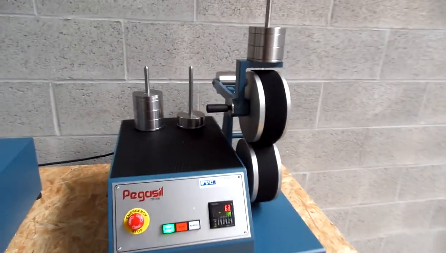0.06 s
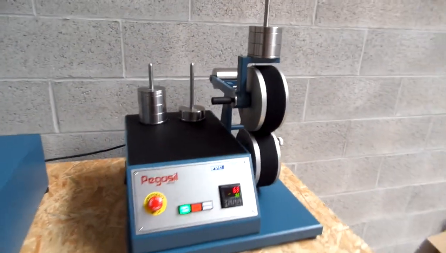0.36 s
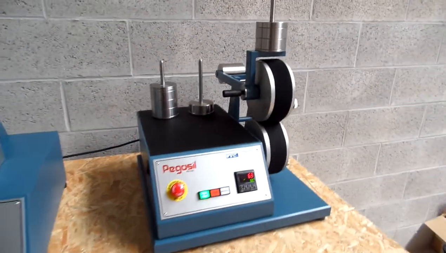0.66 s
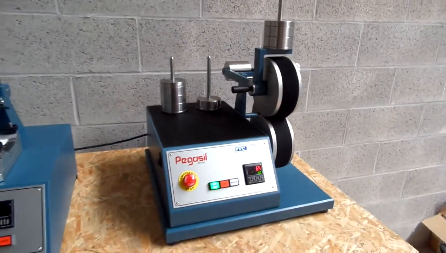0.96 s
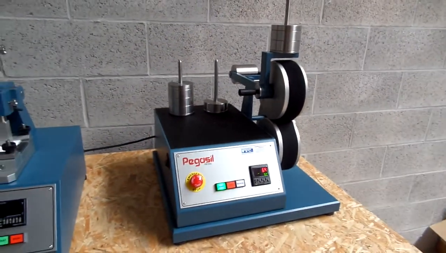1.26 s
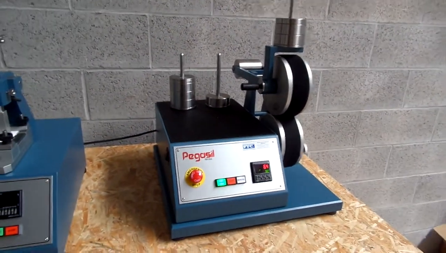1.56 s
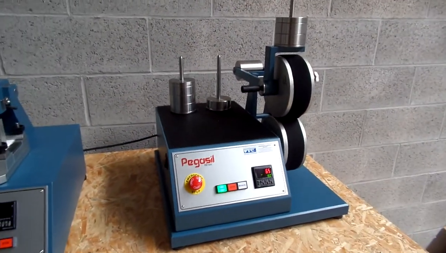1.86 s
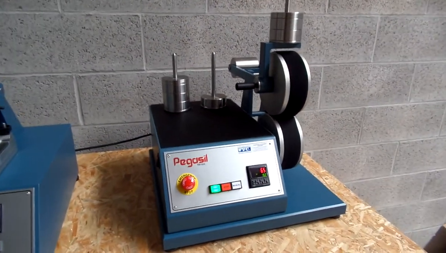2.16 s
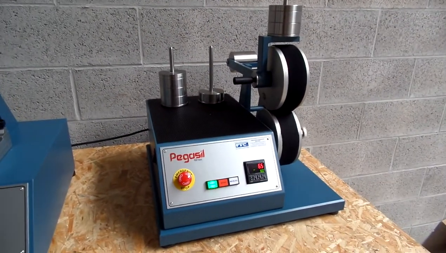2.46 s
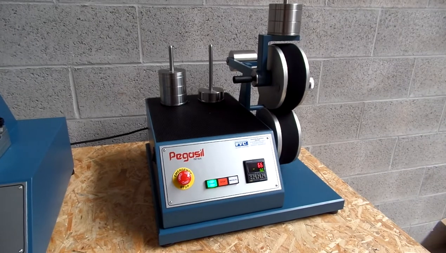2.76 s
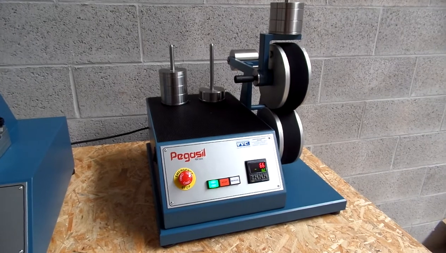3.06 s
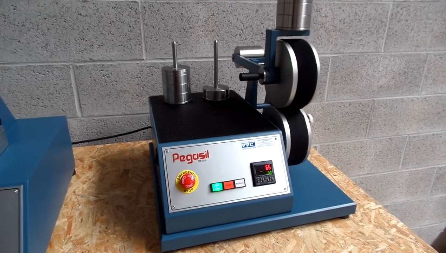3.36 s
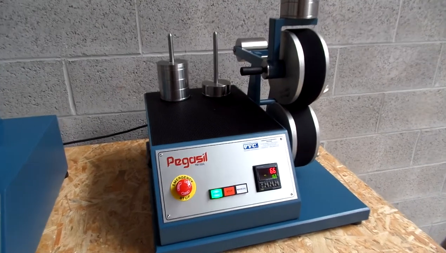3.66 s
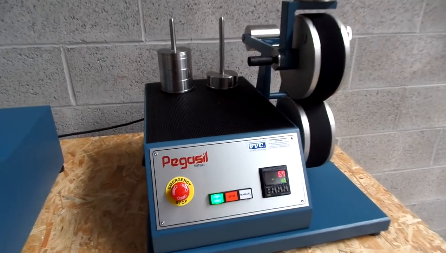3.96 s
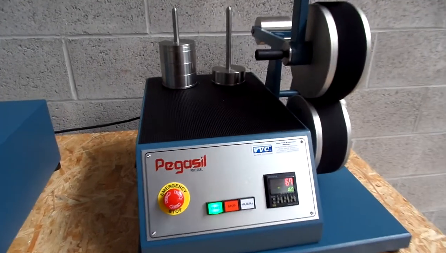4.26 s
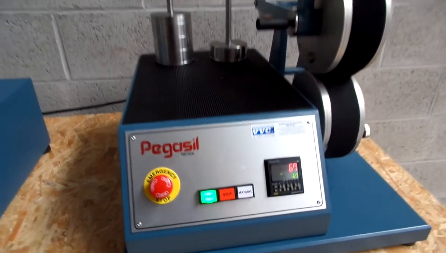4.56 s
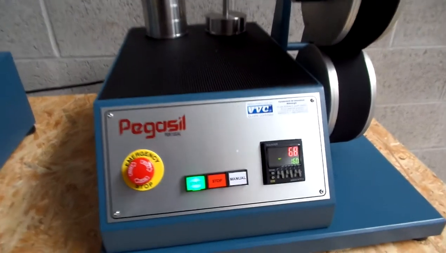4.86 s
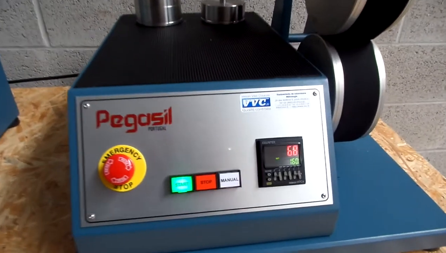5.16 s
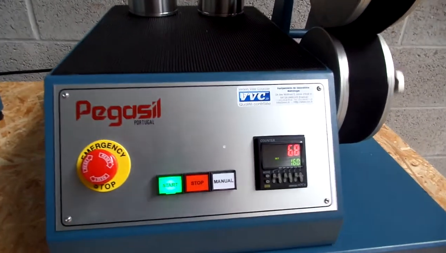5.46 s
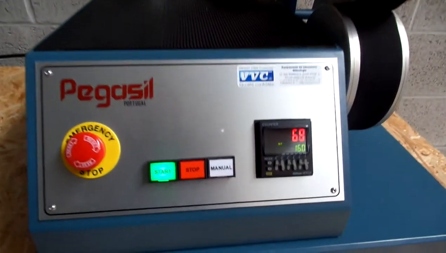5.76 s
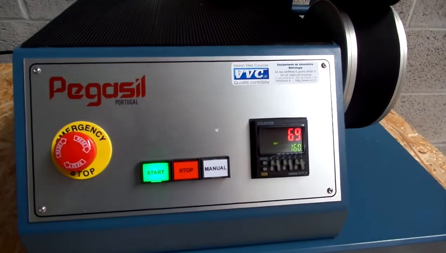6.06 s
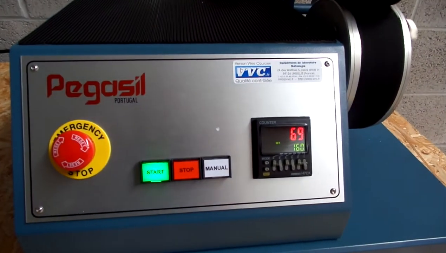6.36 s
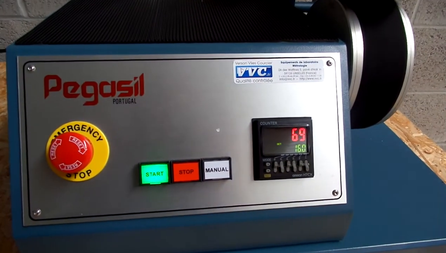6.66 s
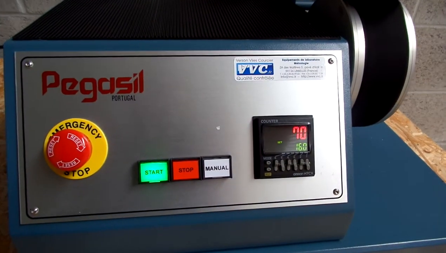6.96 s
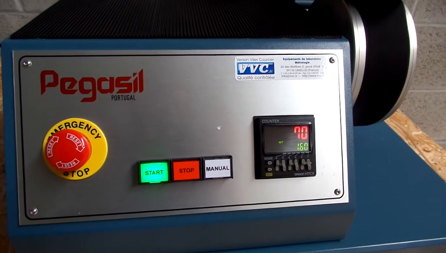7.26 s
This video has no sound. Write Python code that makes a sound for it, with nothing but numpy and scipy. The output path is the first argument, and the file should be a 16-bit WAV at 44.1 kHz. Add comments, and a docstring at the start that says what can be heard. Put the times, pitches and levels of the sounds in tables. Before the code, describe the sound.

A machine rolls two drums of hook-and-loop tape together, making a steady buzzing rasp over a low hum and soft regular bumps.

```python
"""A buzzing rasp comes first: rows of tiny hooks tearing out of their loops, with a fizz of fine fibres.
A bench-top tester rolls two drums covered in hook-and-loop tape together, about one turn a second.
Its frame hums and rumbles. As each drum's tape joint passes, the rasp dips and the frame bumps.
Now and then a stubborn hook lets go with a tick. The microphone drifts back and then closes in,
so echoes from nearby surfaces sweep through the rasp."""
import sys
import numpy as np
from scipy import signal
from scipy.fft import rfft, irfft, next_fast_len
from scipy.io import wavfile
from scipy.ndimage import uniform_filter1d, map_coordinates

SR = 44100
rng = np.random.default_rng(int(sys.argv[2]) if len(sys.argv) > 2 else 0)


def master_out(mix):
    """Clip the mix to full scale and print it as 16-bit PCM to the path in sys.argv[1]."""
    frames = np.transpose(np.atleast_2d(mix))
    ceiling = np.clip(frames, -1, 1)
    pcm = np.round(ceiling * 32767).astype(np.int16)
    wavfile.write(sys.argv[1], SR, pcm)


N = 321930
TIME_S = np.arange(N) / SR
ROW_HZ, GEAR_HZ = 161.0, 41.8
# Each drum's tape joint: first_pass_s, turn_s. The idler drum is slightly larger, so it falls behind.
DRIVEN, IDLER = (.397, .9995), (.605, 1.0178)

def amp(db):
    """Turn decibels into gain."""
    return 10 ** (np.asarray(db) / 20)

def unit(x):
    """Scale to an average (rms) level of 1."""
    return x / np.sqrt(np.mean(x ** 2) + 1e-20)

def noise():
    """Plain white hiss."""
    return rng.standard_normal(N)

def along(points, hz):
    """Read between (pitch_hz, value) points on a log pitch scale."""
    pitches, values = np.transpose(points)
    return np.interp(np.log(hz + 1), np.log(pitches + 1), values)

def curves(table):
    """Turn each column after time_s into one value per sample."""
    times, *columns = np.transpose(table)
    return [np.interp(TIME_S, times, column) for column in columns]

def wobble(rate):
    """A smooth curve through `rate` random points a second."""
    coarse_s = TIME_S[::32]
    points = rng.standard_normal(int(N * rate / SR) + 4)
    return np.interp(TIME_S, coarse_s, map_coordinates(points, [coarse_s * rate], mode="nearest"))

def bell(centre_s, half_s):
    """A smooth hump of height 1."""
    return np.exp(-np.minimum(((TIME_S - centre_s) / half_s) ** 2, 20))

def filtered(x, response):
    """Weight each frequency in x by response(hz)."""
    size = 2 * next_fast_len(N // 2 + SR // 4)
    return irfft(rfft(x, size) * response(np.fft.rfftfreq(size, 1 / SR)), size)[:N]

def coloured(x, spectrum):
    """Give x a tone colour, with no ringing ahead of a click."""
    def response(hz):
        cepstrum = irfft(np.log(amp(along(spectrum, hz))))
        return np.exp(rfft(2 * cepstrum[:len(hz) - 1], len(cepstrum)))
    return unit(filtered(x, response))

def ringing(x, modes):
    """Let x ring at each (pitch_hz, width_hz, level_db)."""
    def response(hz):
        return sum(amp(db) * 1j * hz * width / (pitch ** 2 - hz ** 2 + 1j * hz * width)
                   for pitch, width, db in modes)
    return unit(filtered(x, response))

def crackle(per_second, spread_db, life_s):
    """Tiny bursts of hiss at random moments."""
    sizes = amp(spread_db * np.clip(noise(), -3, 2.6))
    energy = (rng.random(N) < per_second / SR) * sizes ** 2
    fading = signal.lfilter([1], [1, -np.exp(-2 / (life_s * SR))], energy)
    return unit(np.sqrt(fading) * noise())

def passes(drum):
    """The times when a drum's joint meets the other drum."""
    first_s, turn_s = drum
    return np.arange(first_s, N / SR, turn_s)

def row_blur():
    """Rows blur together (1) from each driven joint until just after the idler's; otherwise 0."""
    between = sum((TIME_S > start) & (TIME_S < end + .05)
                  for start, end in zip(passes(DRIVEN), passes(IDLER)))
    return uniform_filter1d(between * 1.0, size=2000)

def release(rows, aligned):
    """Hooks let go in one burst a row, every second one stronger; gear teeth shake the timing."""
    flutter = .085 * np.sin(2 * np.pi * GEAR_HZ * TIME_S + .8 * wobble(5))
    phase = 2 * np.pi * (rows + flutter + .05 * wobble(70))
    burst = np.tanh(2.3 * (np.sin(phase) + .25 * np.cos(2 * phase) + .1))
    return (1 + aligned * burst) * amp(0.69 * np.sin(phase / 2))

# Tone colour of tearing hooks: pitch_hz, relative_db
HOOK_COLOUR = [(300, -26.5), (1700, -25), (2120, -17.5), (2300, -8), (2850, 0), (3350, 1), (3900, -3.5),
               (4500, -1), (5300, -1.5), (6200, 0), (6750, 1.5), (8100, 1.5), (9200, -11), (16000, -20)]
def hook_rasp(rate, level_db, close):
    """Hooks snap out of their loops; the slightly uneven drums press hardest once a turn."""
    turns = (TIME_S - DRIVEN[0]) / DRIVEN[1]
    press_db = 0.8 * np.cos(2 * np.pi * (turns - 0.57))
    hooks = coloured(crackle(3000 * rate, spread_db=3.5, life_s=0.00024), HOOK_COLOUR)
    return amp(level_db - 0.37 + press_db + 0.25 * wobble(18)) * hollow_tone(hooks, close)

def hollow_tone(x, close, far_hz=4100, near_hz=3060, width_hz=240):
    """A hollow ring in the rasp slides down and grows as the microphone closes in."""
    carrier = np.exp(2j * np.pi * np.cumsum(far_hz + (near_hz - far_hz) * close) / SR)
    decay = np.exp(-np.pi * width_hz / SR)
    ring = 2 * np.real(carrier * signal.lfilter([1 - decay], [1, -decay], x / carrier))
    return x + 0.28 * close * ring

# Tone colour of the fine fibres: pitch_hz, relative_db
FIBRE_COLOUR = [(3000, -30), (8000, -13.5), (9500, -8.5), (12500, -4.5), (14500, -1.5), (16000, -1)]
def fibre_fizz(rate, level_db, boost_db, grip, usual_db=-23):
    """Fine fibres fizz, and flare as the tape end flicks free just before the driven joint."""
    fibres = crackle(4000 * (rate + 0.89), spread_db=4.0, life_s=0.000079)
    fizz_db = -28.3 + 1.15 * (level_db - usual_db) + boost_db  # swings wider than the rasp
    flick = amp(level_db - 3.5) * sum(bell(s - .015, 0.0089) for s in passes(DRIVEN))
    return (amp(fizz_db) * grip ** 0.84 + flick) * coloured(fibres, FIBRE_COLOUR)

# Notes of the drum walls: pitch_hz, width_hz, far_level_db, close_change_db
WALL_NOTES = [(440, 140, 0, -8), (512, 72, 3.5, -8.5), (770, 80, 0, 1.5), (917, 180, 3.5, -12),
              (1281, 60, 3.5, 3), (1498, 34, 5, 3), (1634, 147, 6, -0.5), (1968, 134, 8.5, -2)]
def drum_walls(rate, close):
    """Tugging hooks ring the drum walls; each note swells and fades as the microphone moves."""
    tugs = crackle(3000 * (rate + 0.73), spread_db=0.0, life_s=0.00068)
    tugs = filtered(tugs, lambda hz: hz ** 6 / (hz ** 6 + 340 ** 6))  # small drums give no bass
    walls = np.zeros(N)
    for hz, width_hz, far_db, change_db in WALL_NOTES:
        note = signal.lfilter(*signal.iirpeak(hz, hz / width_hz, SR), tugs)
        walls += amp(far_db + change_db * close + 2.6 * wobble(4)) * note
    return unit(walls)

# Echoes off machine, bench and wall, and what closeness and descent add to each:
# delay_ms, close_ms, descent_ms, gain, close_gain, descent_gain
NEAR_SURFACES = [(0.694, 0.26, 0.0019, .39, -0.21, -0.15), (1.08, 0.0029, 0.313, 0.16, .03, -.17),
                 (1.27, 0.0031, .52, .16, 0.013, .03)]
def near_echoes(x, close, descent, share):
    """Quick echoes shift as the microphone moves; share scales their strength."""
    total, power = x, 1
    for ms, close_ms, descent_ms, gain, close_gain, descent_gain in NEAR_SURFACES:
        delay_ms = ms + close_ms * close + descent_ms * descent
        strength = share * (gain + close_gain * close + descent_gain * descent)
        total = total + strength * map_coordinates(x, [np.arange(N) - delay_ms * SR / 1000])
        power = power + strength ** 2
    return total / np.sqrt(power)

# Base loudness of the tearing tape: time_s, level_db
TAPE_LOUDNESS = [(0, -26.0), (1, -25.0), (2, -23), (3, -22.5), (3.5, -23.5), (3.9, -21), (4.5, -22),
                 (5.2, -22), (6.3, -24.5), (7, -23), (7.3, -23.5)]
# Microphone path: time_s, closeness (0 far, 1 near), descent (0 above the drums, 1 at the front panel)
MICROPHONE_PATH = [(0, .52, 0), (.7, .04, .04), (1.2, 0, .11), (2, .08, .18), (3.3, .14, .21),
                   (3.9, .42, .27), (4.5, .66, .36), (5.2, 1, .64), (5.9, .93, .93), (7.3, .85, 1)]
def tearing_tape(rows, aligned, blur):
    """Rasp, fizz and ringing drum walls all dip as a joint passes."""
    level_db, = curves(TAPE_LOUDNESS)
    close, descent = curves(MICROPHONE_PATH)
    rate = release(rows, aligned)
    driven_dip_db = 6.6 * sum(bell(s, half_s=0.013) for s in passes(DRIVEN))
    idler_dip_db = 5.8 * sum(bell(s, half_s=0.025) for s in passes(IDLER))
    grip = amp(-driven_dip_db - idler_dip_db)
    # Blurred rows rasp louder but tug the walls less.
    blur_db, wall_blur_db = 1.46 * blur, -1.3 * blur
    # Down at the panel more fizz arrives, while the housing blocks some of the walls' sound.
    near_db, shade_db = 0.6 * descent, -3 * descent
    rasp = grip * hook_rasp(rate, level_db + blur_db, close)
    fizz = fibre_fizz(rate, level_db, near_db + blur_db, grip)
    walls = amp(level_db - 20.5 + shade_db + wall_blur_db) * np.sqrt(grip) * drum_walls(rate, close)
    return (near_echoes(rasp + walls, close, descent, share=.85)
            + near_echoes(fizz, close, descent, share=.35))

# Notes of the frame: pitch_hz, width_hz, relative_db
FRAME_NOTES = [(82, 5, -6), (118, 5.6, 0), (152.5, 21, 8.5), (187, 11, 7), (310.4, 46, 5.5)]
# Base loudness of the frame: time_s, rumble_db, octave_hum_db
FRAME_LOUDNESS = [(0, -52.5, -57.5), (1, -53.5, -55.5), (2, -50.5, -56.5), (3.2, -51.5, -54), (4, -50, -53),
                  (4.8, -53.5, -57), (5.6, -51, -55.5), (6.3, -54, -59.5), (7.3, -53, -62)]
def frame_hum(rows, aligned):
    """The frame rumbles under the drums and hums at the row rate and an octave above."""
    rumble_db, octave_db = curves(FRAME_LOUDNESS)
    shaking = ringing(noise(), FRAME_NOTES)
    # Little sound escapes between the low notes and the top one.
    shaking = filtered(shaking, lambda hz: 1 - 0.84 * np.exp(-((hz - 245) / 35) ** 2))
    rumble = amp(rumble_db - 1.0 + 2.2 * wobble(6.1)) * shaking
    hum_gain = amp(rumble_db - 2.5 + 1.7 * wobble(6.02)) * (0.3 + 1.02 * aligned)
    hum = hum_gain * np.sin(2 * np.pi * rows + .35 * wobble(14))
    octave = amp(octave_db + 1.8 * wobble(9.4)) * np.sin(4 * np.pi * rows)
    return rumble + hum + octave

# Tone colour of the background: pitch_hz, relative_db
AIR_COLOUR = [(20, -8), (45, -12), (80, -2), (250, -3), (1000, -9), (8000, -25)]
def room_air():
    """A faint, low, steady rush."""
    return amp(-66) * coloured(noise(), AIR_COLOUR)

# How long the room's echo takes to fall by 60 dB: pitch_hz, fade_s
ROOM_FADE = [(200, 0.26), (3000, 0.21), (14000, 0.22)]
def room_echo(x, steps=30):
    """The block walls answer with a short tail that changes as the microphone moves."""
    echo, hop = np.zeros(N + 2 * SR), N // steps
    for step in range(steps + 1):
        hz, t, spectrum = signal.stft(rng.standard_normal(SR // 2), SR, nperseg=256)
        fade = amp(-60 * t / along(ROOM_FADE, hz)[:, None])
        tail = signal.istft(spectrum * fade, SR, nperseg=256)[1]
        part = np.arange(max((step - 1) * hop, 0), min((step + 1) * hop, N))
        crossfade = np.cos(np.pi / 2 * (part / hop - step))
        wet = signal.fftconvolve(x[part] * crossfade, tail / np.linalg.norm(tail))
        echo[part[0] + SR // 300:][:len(wet)] += wet
    return echo[:N]

# How hard the driven joint bumps the frame, one value a turn: strength_db
JOINT_BUMPS_DB = [-49, -49.5, -47, -47, -43, -48, -50]
def joint_bumps(idler_db=-49):
    """The driven joint's raised edge knocks; the weighted drum drops into each joint with a thud."""
    driven = list(zip(passes(DRIVEN), JOINT_BUMPS_DB))
    idler = [(s, idler_db) for s in passes(IDLER)]
    drops = sum(amp(db) * (bell(s + 0.023, 0.034) + .5 * bell(s + 0.11, 0.077))
                for s, db in driven + idler)
    thud = amp(-5) * drops * ringing(ringing(noise(), [(116, 21, 0)]), [(116, 42, 0)])
    edges = sum(amp(db) * bell(s - .008, 0.026) for s, db in driven)
    edge_ring = ringing(noise(), [(340, 55, 0), (560, 160, -2)])
    knock = amp(-2) * edges * ringing(edge_ring, [(380, 170, 0)])
    return thud + knock

# Single hooks that hold on longer: start_s, strength_db, pitch_hz
STUBBORN_HOOKS = [(1.4462, -5, 6880), (1.5194, -9, 6020), (2.8529, -3, 6670), (3.6037, -2, 4130),
                  (3.9724, -6, 7810), (4.2244, -1, 5860), (4.6838, -13, 3370), (4.8324, -14, 3360),
                  (4.963, -14, 3250), (4.9766, -5, 6910), (5.001, -5, 7400), (5.287, -4, 7380),
                  (5.9858, -8, 3300), (6.3596, -6, 7440), (6.9127, -5, 7560)]
def hook_ticks():
    """A stubborn hook lets go with a sharp tick of its own pitch."""
    ticks, t = np.zeros(N), np.arange(SR // 200) / SR
    burst = np.exp(-((t - .0006) / .00022) ** 2)
    for start_s, db, hz in STUBBORN_HOOKS:
        ticks[round(start_s * SR):][:len(t)] += amp(db - 3) * burst * np.sin(2 * np.pi * hz * t)
    return ticks

def scene():
    """The running machine in its room."""
    rows = ROW_HZ * TIME_S + .13 * wobble(2) + .03 * wobble(25)  # hook rows passed; the speed wavers
    blur = row_blur()
    aligned = np.clip(0.79 + 0.047 * wobble(12) - .7 * blur, 0, 1)  # high when rows tear one by one
    tearing = tearing_tape(rows, aligned, blur) + hook_ticks()
    air = room_air()
    echo = amp(-9.5) * room_echo(tearing)
    return (tearing + echo + frame_hum(rows, aligned) + joint_bumps() + air)[None]

def record(dry, bass_hz=62, top_hz=15760):
    """The microphone loses the deepest bass, and the highest treble is cut off."""
    return filtered(dry[0], lambda hz: hz ** 2 / np.hypot(hz ** 2, bass_hz ** 2) * (hz < top_hz))[None]

dry = scene()
out = record(dry)
master_out(out)
```